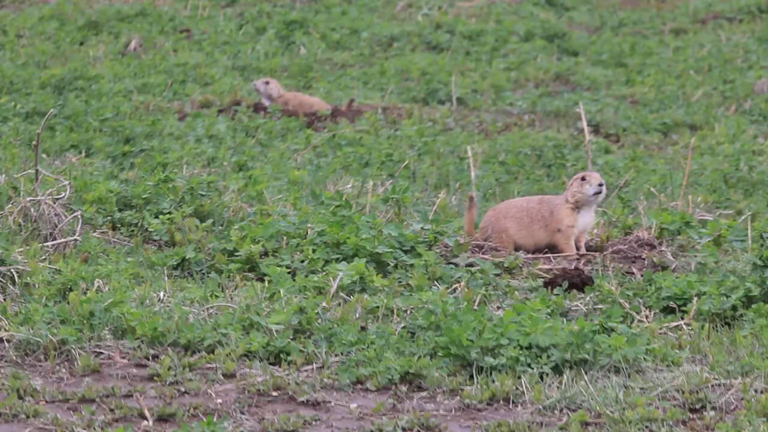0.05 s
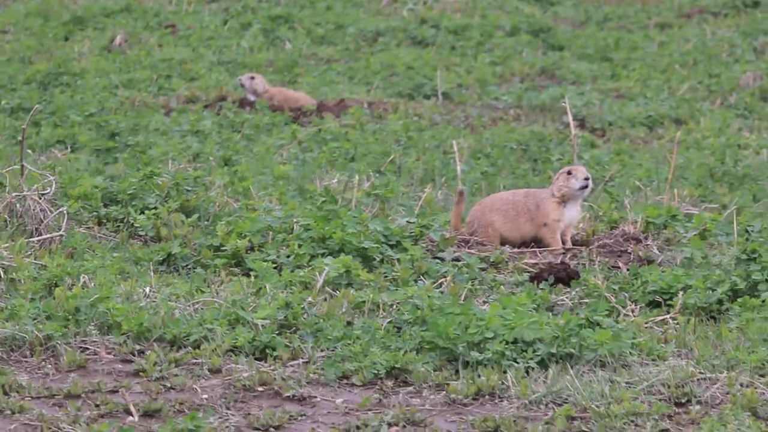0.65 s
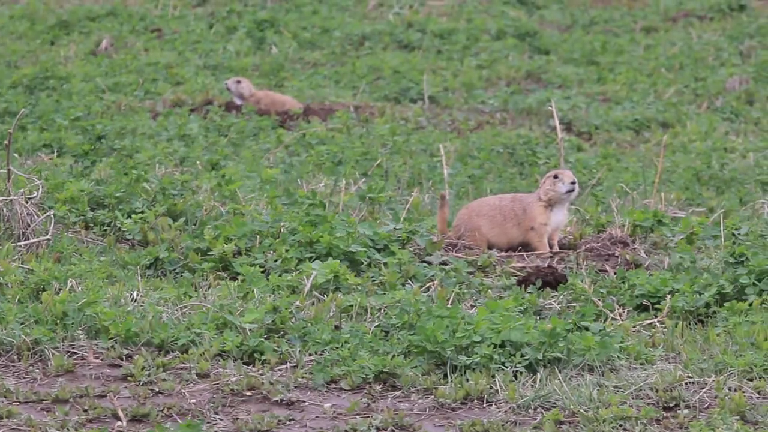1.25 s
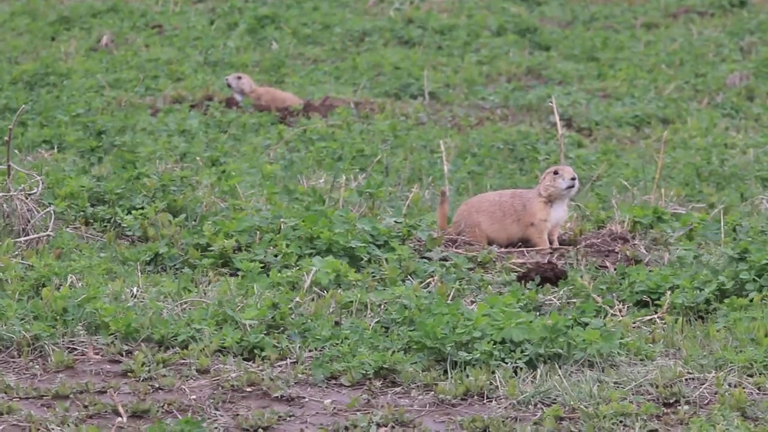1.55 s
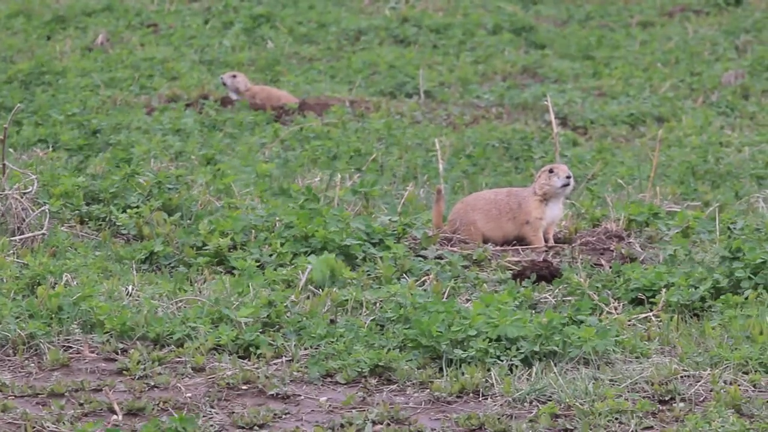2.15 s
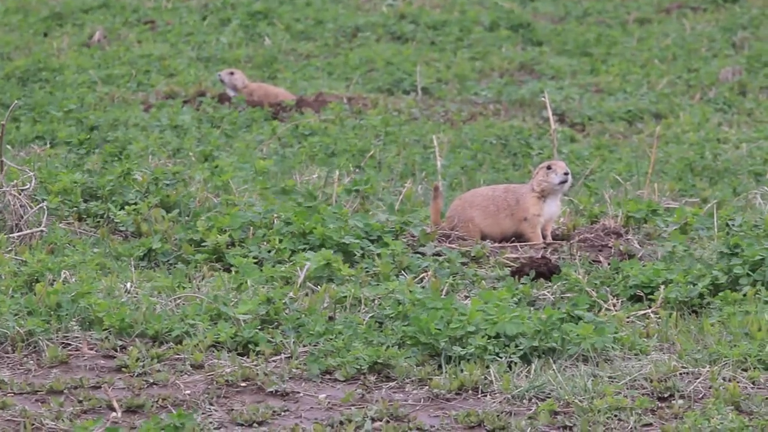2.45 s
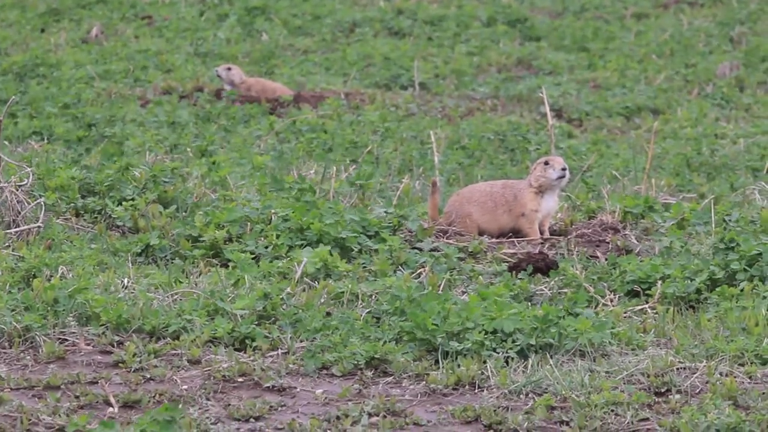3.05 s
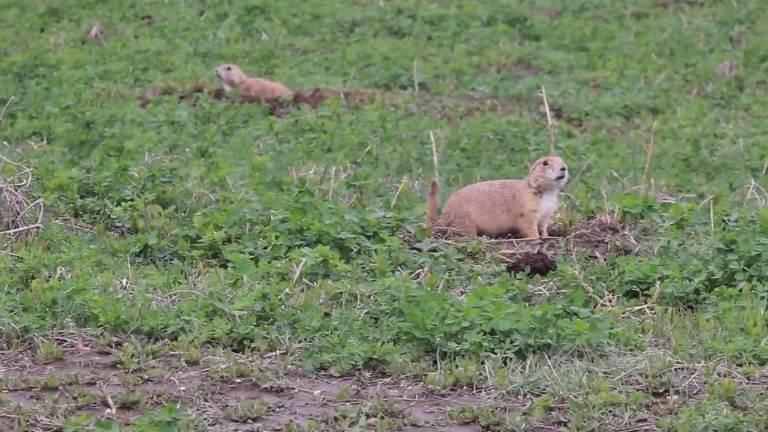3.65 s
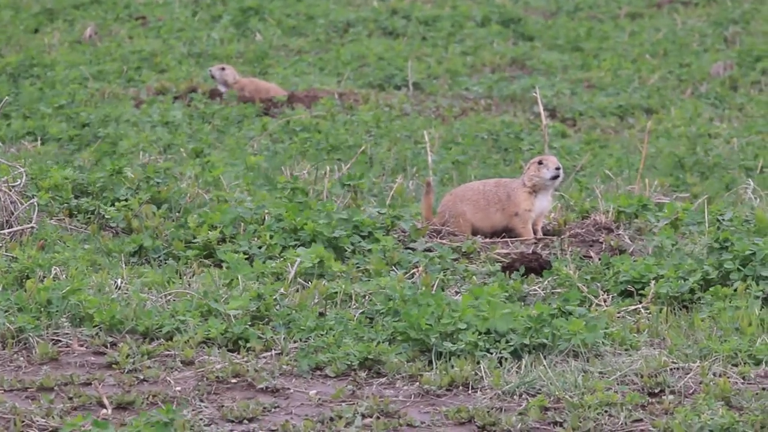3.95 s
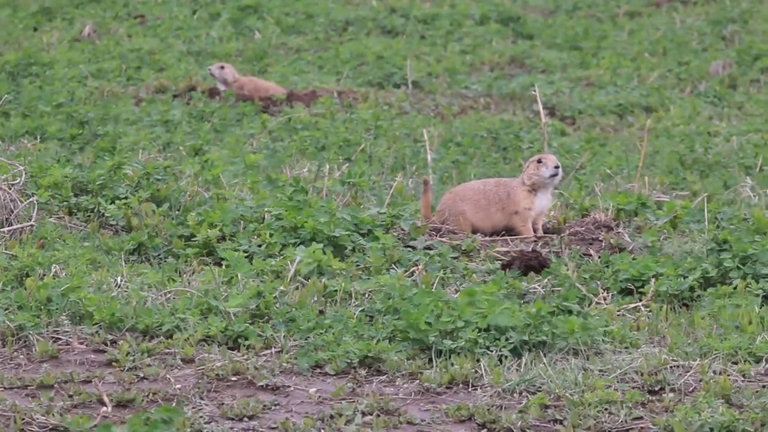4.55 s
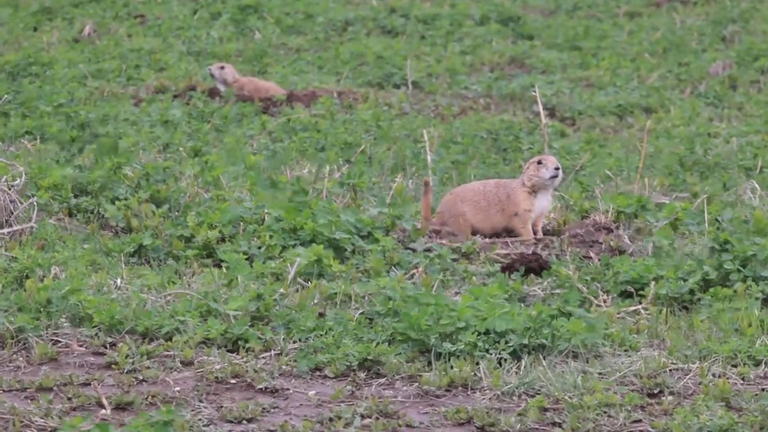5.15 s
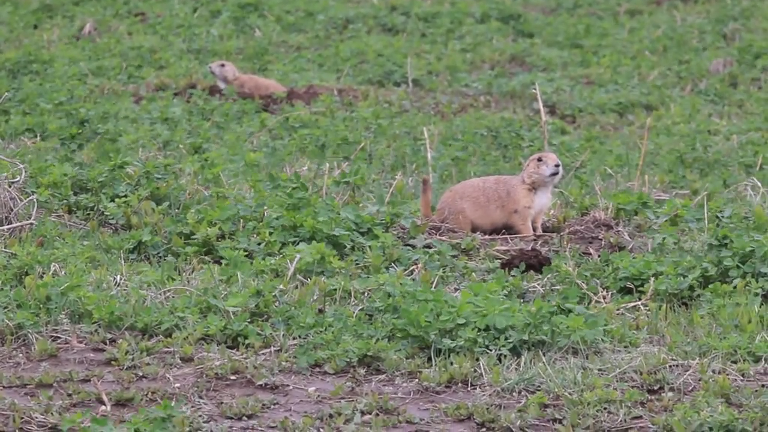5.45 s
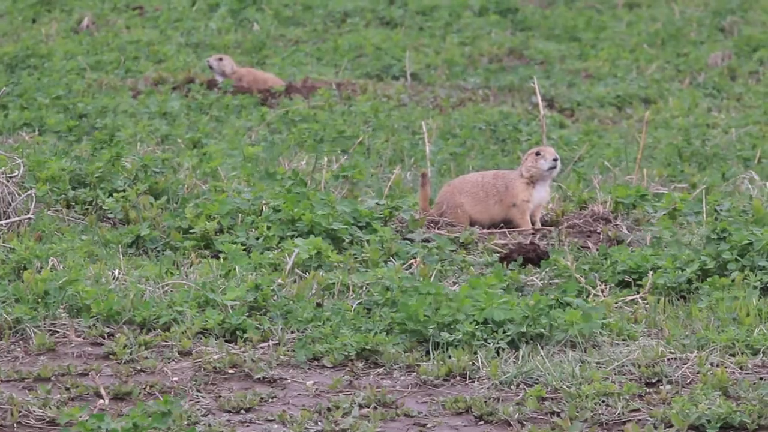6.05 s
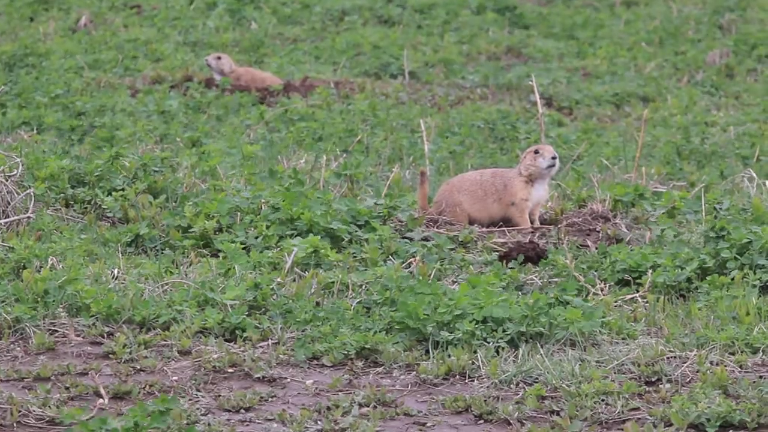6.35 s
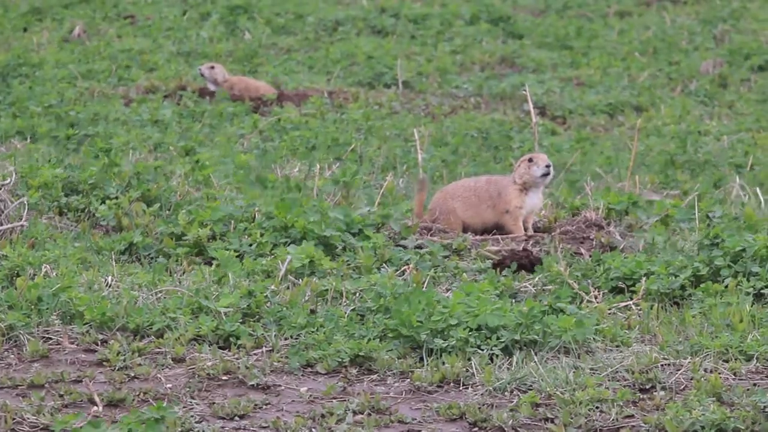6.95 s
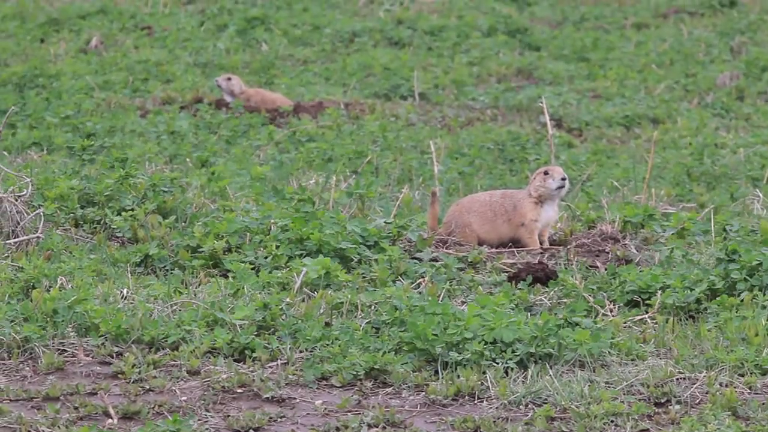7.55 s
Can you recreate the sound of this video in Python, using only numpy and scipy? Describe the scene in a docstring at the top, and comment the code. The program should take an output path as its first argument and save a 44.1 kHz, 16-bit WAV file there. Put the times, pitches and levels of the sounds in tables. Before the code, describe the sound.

A nearby prairie dog barks from about 0.3 seconds until the end, near 8 seconds, at a steady two or three barks a second. Each bark is a very short, bright chirp that rises and falls in pitch, some breaking into a hoarse rasp. A second prairie dog, farther off and much fainter, barks less regularly in the gaps. The open field gives almost no echo.

From about 0.2 seconds, strong gusts buffet the microphone with an uneven rumble, roar and crackle, often louder than the animals. Sharp wind snaps stand out around 1.3 to 1.5, 2.3, 4 and 6 seconds. The wind drops suddenly near 4.6 and 5.6 seconds, leaving a quiet rush of air, returns strongly from about 5.9 to 7, then weakens to brief puffs. A few very faint, short hisses fall between barks, around 3, 5.5 and 7.3 seconds.

```python
"""Prairie dogs in a gusty field

Two prairie dogs bark, one near and one farther off, each up to about 2.6 times a second. Every bark is
a short arch of pitch with many overtones, hoarser the higher it is, faintly scattered back by the grass.
Strong gusts buffet the microphone: eddies rumble, roar, crackle and snap. A few sudden lulls leave
the quiet rush of the field, and faint hisses come between the barks."""
import sys
import numpy as np
from scipy import signal
from scipy.fft import rfft, irfft, next_fast_len
from scipy.io import wavfile
from scipy.ndimage import uniform_filter1d, map_coordinates

SR = 44100
rng = np.random.default_rng(int(sys.argv[2]) if len(sys.argv) > 2 else 0)


def to_wav(s):
    """Save 16-bit WAV."""
    ch = np.atleast_2d(s).T  # columns
    pcm = np.round(np.clip(ch, -1, 1) * 32767)  # PCM
    wavfile.write(sys.argv[1], SR, pcm.astype(np.int16))


N = 344862

# The near animal's barks: start_s, length_s, top_pitch_hz, level_db (relative)
NEAR_BARKS = [(.261, .044, 1700, -36), (.594, .039, 1686, -32), (.958, .05, 1720, -33.5),
              (1.341, 0.063, 1670, -42), (1.932, 0.052, 1790, -34), (2.31, 0.033, 1745, -33),
              (2.721, .041, 1830, -32), (3.134, .04, 1790, -33), (3.519, .042, 1677, -32.5),
              (3.922, 0.05, 1735, -38.5), (4.286, .038, 1706, -33.5), (4.598, 0.043, 1640, -31),
              (4.986, 0.044, 1682, -31), (5.363, 0.046, 1720, -33), (5.76, .046, 1767, -31.5),
              (6.135, 0.045, 1860, -35), (6.514, .036, 1846, -36.5), (6.889, 0.049, 1867, -36),
              (7.251, .046, 1813, -34), (7.628, 0.044, 1750, -30)]
# Its throat and mouth resonances: frequency_hz, gain_db
NEAR_THROAT = [(1700, -29), (2600, -12), (3350, -1.5), (3800, 1.5), (4300, -17), (5150, -15.5),
               (5800, -22.5), (6700, -23), (7700, -47.5), (8500, -42), (9700, -33), (11000, -50.5),
               (14100, -46.5), (15500, -66)]
# The colour of its hoarse breath: frequency_hz, gain_db
BREATH_COLOUR = [(1500, -20), (3000, 2.5), (5500, 4), (7700, -18.5), (9500, -10), (12000, -20.5),
                 (14200, -22), (15800, -27.5)]


def near_dog():
    """The lead voice: bright barks, with throat turbulence that grows toward the end of hoarse ones."""
    voice = barking(NEAR_BARKS, NEAR_THROAT, droop=0.44, sag=1.15, rasp_rad=.15, doubling_db=-19)
    swell = np.zeros(N + SR)
    for start, length, top_hz, db in NEAR_BARKS:
        u = np.linspace(0, 1, int(length * SR))
        fades = np.clip(np.minimum(u, 1 - u) / .1, 0, 1)
        swell[round(start * SR):][:len(u)] += amp(db) * hoarseness(top_hz) * voice_break(u) * fades
    breath = swell[:N] * coloured_noise(BREATH_COLOUR)
    return amp(-1) * voice + amp(-24) * breath


# The far animal's barks: start_s, top_pitch_hz, level_db (relative)
FAR_BARKS = [(.355, 1860, -55.5), (0.717, 1830, -61), (1.11, 1840, -72), (1.84, 1850, -61),
             (2.188, 1840, -56), (2.935, 1830, -64.5), (3.323, 1800, -61), (3.711, 1840, -63.5),
             (4.067, 1810, -70), (4.523, 1710, -74.5), (4.786, 1765, -60), (5.244, 1656, -76),
             (5.546, 1740, -67.5), (6.261, 1750, -61), (7, 1700, -68.5), (7.349, 1700, -70.5),
             (7.725, 1710, -66.5)]
# Its throat and mouth resonances: frequency_hz, gain_db
FAR_THROAT = [(1700, 4.5), (3400, 8), (5300, 4.5), (6900, 0), (8300, -24.5), (10500, -26), (12000, -18.5),
              (14500, -48)]


def far_dog(length_s):
    """The second voice: faint barks of one length, with stronger tones between the overtones."""
    barks = [(start, length_s, top_hz, db) for start, top_hz, db in FAR_BARKS]
    return amp(-.5) * barking(barks, FAR_THROAT, droop=.33, sag=1.0, rasp_rad=0.13, doubling_db=-2.5)


def barking(barks, throat, droop, sag, rasp_rad, doubling_db):
    """In each bark the pitch rises and falls, sliding the overtones through the throat's resonances."""
    out = np.zeros(N + SR)
    for start, length, top_hz, db in barks:
        size = int(length * SR)
        u = np.linspace(0, 1, size)
        hoarse = hoarseness(top_hz)
        apex = .475 - .06 * hoarse  # a hoarse bark peaks earlier
        arch = 1 - droop * (u - apex) ** 2 - sag * (u - apex) ** 4  # slack folds steepen both ends
        pitch = top_hz * arch * (1 + 0.0024 * wobble(500, size))
        rough = hoarse * voice_break(u)
        phase = 2 * np.pi * np.cumsum(pitch) / SR + rasp_rad * rough * wobble(2200, size)
        voice = np.zeros(size)
        for k in range(1, 10):
            flicker_db = 0.37 * k * wobble(98, size)
            overtone = amp(curve_at(throat, k * pitch) + flicker_db) * np.sin(k * phase)
            # alternate cycles differ, which adds tones halfway between the overtones
            between = amp(curve_at(throat, (k + .5) * pitch) + doubling_db) * np.sin((k + .5) * phase)
            voice += overtone + rough * between * wobble(300, size)
        fades = np.clip(u / 0.093, 0, 1) * np.clip((1 - u) / 0.083, 0, 1)
        out[round(start * SR):][:size] += voice * fades * amp(db + 0.49 * wobble(220, size))
    return out[:N]


def hoarseness(top_hz, clear_hz=1617, strain_span_hz=280):
    """The voice strains as it climbs: 0 is clear, 1 fully hoarse."""
    return np.clip((top_hz - clear_hz) / strain_span_hz, 0, 1)


def voice_break(u, early_rasp=0.2, break_at=0.52, width=0.11):
    """A hoarse bark starts almost clean and breaks into a rasp as u runs from 0 to 1."""
    return early_rasp + .5 * (1 + np.tanh((u - break_at) / width))


# Gusts on the microphone: start_s, length_s, opening_level_db (relative), drop_db, extra_fizz_db
GUSTS = [(.193, 0.065, -31, 0, 3.5), (0.278, 0.34, -24.5, -3, -3.5), (0.661, 0.038, -20.5, 3.5, -3.5),
         (0.817, .055, -27, 0.5, -8), (.922, 0.022, -24.5, 4, -9), (0.996, 0.025, -26.5, -6, -4.5),
         (1.024, 0.26, -21.5, -1.5, -4.5), (1.278, .15, -22, 1.5, 7), (1.494, 0.23, -20, 5.5, 6),
         (1.699, .1, -27.5, -0.5, 3.5), (1.809, 0.12, -22, 5, 3.5), (1.943, .49, -24, 0, 4.5),
         (2.514, 0.34, -21, 5.5, 2.5), (2.848, 0.13, -26.5, 3, -6), (3.063, 0.2, -22.5, -1.5, -2.5),
         (3.279, 0.22, -22.5, 4, 0), (3.574, 0.3, -24, -5.5, -2), (3.882, .24, -26.5, 0.5, 3),
         (3.982, .014, -20, -1, 7.5), (4.144, .33, -24, 2, 0), (4.683, .26, -24.5, -4, -5),
         (4.959, .14, -30.5, 3.5, -3), (5.105, 0.11, -19, 1.5, 1), (5.373, .12, -31.5, 4.5, 4.5),
         (5.557, 0.0075, -41, -2.5, -1), (5.785, 0.094, -37, -10, -10), (5.874, 0.095, -19.5, 3, 4),
         (5.988, 0.19, -22, -1.5, 4), (6.3, 0.27, -22.5, 0.5, 3), (6.541, 0.46, -21.5, 7, -1.5),
         (7.105, .125, -27, -5, -6), (7.246, 0.071, -28, 11, 3.5), (7.429, .1, -35, -1, -16),
         (7.571, 0.029, -42, -3.5, -3)]
# The light breeze between them: time_s, level_db (relative)
BREEZE = [(.1, -66), (.95, -41), (1.45, -25.5), (2.47, -35.5), (3.5, -30.5), (4.45, -46), (4.55, -64),
          (5.3, -51.5), (5.64, -69), (6.0, -27), (6.25, -29.5), (7.05, -45), (7.38, -49), (7.7, -63),
          (7.8, -57)]


def gusts(surge_db, surge_hz, rise_db_per_s=649, fall_db_per_s=697):
    """Gusts rise, hold and fall, driving rumble, roar and fizz levels (dB about each one's mean power)."""
    t = np.arange(0, N / SR, .002)
    strength = np.interp(t, *np.transpose(BREEZE))
    extra_fizz = np.zeros(len(t))
    for start, length, db, drop_db, fizz_db in GUSTS:
        edges = rise_db_per_s * np.maximum(start - t, 0) + fall_db_per_s * np.maximum(t - start - length, 0)
        gust = db - drop_db * np.clip((t - start) / length, 0, 1) - edges
        extra_fizz = np.where(gust > strength, fizz_db, extra_fizz)
        strength = np.maximum(strength, gust)
    sample_times = np.arange(N) / SR
    roar = np.interp(sample_times, t, strength) + surge_db * wobble(surge_hz, N)
    rumble = 0.59 * roar
    fizz = 1.54 * roar + np.interp(sample_times, t, uniform_filter1d(extra_fizz, size=6))
    return [db - 10 * np.log10(np.mean(amp(db) ** 2)) for db in (rumble, roar, fizz)]


# The strongest single eddies: time_s, strength (relative)
EDDIES = [(0.189, 12.5), (0.27, 3), (.44, 9.5), (0.479, 8), (0.676, 3), (.821, 13), (1.045, 10),
          (1.294, 12), (1.659, 3), (1.955, 12), (2.396, 6), (2.693, 12), (2.826, 5.5), (3.003, 9),
          (3.068, 2), (3.624, 6), (3.655, 5), (4.308, 10.5), (4.426, 10.5), (4.867, 6), (4.922, 4.5),
          (4.966, 14), (5.171, 4.5), (5.424, 15.5), (7.151, 13), (7.226, 8.5), (7.5, 11.5), (7.523, 10.5)]


def turbulence(eddy_hz, swirl_hz, life_s):
    """Strength of the eddies passing the microphone port: a random swirl, with strong ones on cue."""
    swirl = unit_rms(wobble(eddy_hz, N) + 0.84 * wobble(swirl_hz, N))
    half = SR // 20
    u = np.arange(-half, half) / SR / life_s
    reach = 2.5  # in eddy lives
    calm = 1 - np.exp(-(u / reach) ** 2)  # a strong eddy pushes the small ones aside
    slack = 4 * np.exp(-(u + reach) ** 2)  # the air slackens just ahead of it
    for time, strength in EDDIES:
        span = slice(round(time * SR) - half, round(time * SR) + half)
        swirl[span] = swirl[span] * calm + 0.32 * (strength * np.exp(-u ** 2) - slack)
    return 3 * np.tanh(swirl / 3)


# The colour of the buffeting: frequency_hz, gain_db
BUFFET_COLOUR = [(13, -37), (22, -23.5), (66, -4.5), (108, -1), (299, 0.5), (645, -4.5), (3540, -27),
                 (3950, -32.5), (15600, -81)]
# How hard an eddy of unit strength shakes each band: frequency_hz, depth_db
FLUTTER_DEPTH = [(100, 1.1), (500, 3), (2000, 2.5), (5000, 2.5), (11000, 3.5)]


def wind_buffet(rumble, roar, fizz, crackle_db, crackle_hz, knee_hz, floor_db):
    """Wind on the microphone in half-octave bands: each eddy lifts them all, the high ones most."""
    eddies = turbulence(eddy_hz=650, swirl_hz=140, life_s=0.0034)
    crackle = crackle_db * np.clip(wobble(crackle_hz, N), -2.8, 2.8)  # the finest eddies tear in ticks
    tearing = 2.5 * np.tanh(fizz / 6) + crackle  # fierce gusts open the top octaves
    # slow air carries no small eddies: the roar rolls off at a knee that rises with the flow
    knee = knee_hz * amp(0.66 * (roar + 8.2 * eddies))
    white, out = rng.standard_normal(N), np.zeros(N)
    for centre in 31.25 * 2 ** np.arange(0, 9.5, .5):
        band = filtered(white, lambda hz: np.clip(1 - 2 * abs(np.log2((hz + 1) / centre)), 0, 1))
        low = curve_at([(220, 1), (800, 0.14)], centre)
        high = curve_at([(2000, 0.0089), (4800, 0.92)], centre)
        top = curve_at([(2200, 0), (10000, 0.92)], centre)
        gust_db = low * rumble + (1 - low - high) * roar + high * fizz + top * tearing
        flutter_db = curve_at(FLUTTER_DEPTH, centre) * eddies
        rolloff = amp(floor_db) + 1 / (1 + (centre / knee) ** 4)
        out += band * unit_rms(rolloff * amp(gust_db + flutter_db))
    return unit_rms(filtered(out, lambda hz: amp(curve_at(BUFFET_COLOUR, hz))))


# The hardest eddies snapping on the port: time_s, level_db (relative)
SNAPS = [(.677, -32.5), (1.292, -26), (1.528, -24.5), (1.656, -32.5), (2.186, -30.5), (2.336, -24),
         (2.394, -33), (3.654, -32), (3.983, -25), (4.424, -33), (5.127, -34), (5.168, -29.5),
         (5.937, -24.5), (6.073, -21.5), (6.445, -29), (7.22, -42)]


def wind_snaps(fizz, hard_db, small_db, base_rate_hz, life_s, port_hz):
    """Steep pressure fronts that relax at once: a few hard ones, and many small ones in fierce gusts."""
    hits = rng.random(N) < base_rate_hz / SR * amp(1.7 * fizz)
    fronts = hits * amp(small_db + 0.35 * fizz) * rng.standard_normal(N)
    for time, db in SNAPS:
        fronts[round(time * SR)] += amp(db + hard_db)
    u = np.arange(SR // 50) / SR / life_s
    cracks = signal.fftconvolve(fronts, (1 - u) * np.exp(-u))[:N]
    return filtered(cracks, lambda hz: 1 / (1 + (hz / port_hz) ** 2))  # the port rounds off each front


def field_scatter(voice, t60_s):
    """Grass and mounds scatter back a short diffuse tail."""
    t = np.arange(SR // 2) / SR
    tail = rng.standard_normal(len(t)) * amp(-60 * t / t60_s)
    return signal.fftconvolve(voice, tail / np.linalg.norm(tail))[:N]


# Faint hisses between the barks: start_s, length_s, level_db
HISSES = [(2.984, 0.014, -55), (5.327, 0.022, -64), (5.587, 0.05, -59), (5.709, 0.022, -64),
          (7.296, 0.048, -61), (7.58, .025, -71), (7.71, 0.028, -64)]
# Their colour: frequency_hz, gain_db
HISS_COLOUR = [(1500, -23), (3000, 3), (4500, -1), (6500, -18), (8500, -34), (15000, -37)]


def hisses():
    """Short soft patches of high noise, each with a rounded swell."""
    t, swell = np.arange(N) / SR, np.zeros(N)
    for start, length, db in HISSES:
        from_middle = 2 * (t - start) / length - 1
        swell += amp(db) * np.sqrt(np.clip(1 - from_middle ** 2, 0, 1))
    return swell * coloured_noise(HISS_COLOUR)


# The colour of the open air: frequency_hz, gain_db
AIR_COLOUR = [(30, -8.5), (150, 6.5), (400, -9), (1000, -11.5), (1700, -18), (3000, -26), (5500, -33),
              (8000, -43.5), (15000, -46.5)]


def open_air(level_db):
    """The quiet, wavering rush of the field, heard in the lulls."""
    return coloured_noise(AIR_COLOUR) * amp(level_db + 1.5 * wobble(5.4, N))


def amp(db):
    """Decibels to gain."""
    return 10 ** (np.asarray(db) / 20)


def unit_rms(x):
    """x scaled to rms 1."""
    return x / np.sqrt(np.mean(x ** 2) + 1e-20)


def curve_at(points, hz):
    """A curve of (frequency, value) points, read on a log frequency axis."""
    frequencies, values = np.transpose(points)
    return np.interp(np.log(hz + 1), np.log(frequencies + 1), values)


def wobble(rate_hz, size):
    """A smooth random curve with rate_hz knots a second."""
    knots = rng.standard_normal(int(size * rate_hz / SR) + 4)
    return map_coordinates(knots, [np.arange(size) * rate_hz / SR])


def filtered(x, response):
    """x equalised by response, a gain for each frequency."""
    size = next_fast_len(N + 8192)
    return irfft(rfft(x, size) * response(np.fft.rfftfreq(size, 1 / SR)), size)[:N]


def coloured_noise(colour):
    """Noise at rms 1, shaped by (frequency_hz, gain_db) points."""
    return unit_rms(filtered(rng.standard_normal(N), lambda hz: amp(curve_at(colour, hz))))


def scene():
    """The mono mix: both animals and their echoes, the wind, and a bed of quiet air."""
    near, far = near_dog(), far_dog(length_s=.049)
    echoes = amp(-22) * field_scatter(near, t60_s=0.12) + amp(-17.5) * field_scatter(far, t60_s=.3)
    rumble, roar, fizz = gusts(surge_db=1.5, surge_hz=46)
    buffet = wind_buffet(rumble, roar, fizz, crackle_db=5.5, crackle_hz=1500, knee_hz=3200, floor_db=-14)
    snaps = wind_snaps(fizz, hard_db=10.5, small_db=-32, base_rate_hz=45, life_s=0.00049, port_hz=7960)
    return (near + far + echoes + amp(-21.5) * buffet + snaps + hisses() + open_air(level_db=-57.5))[None]


def record(dry, ceiling=.66, top_hz=15800):
    """A quick fade-in; the microphone squashes the tallest gusts and passes nothing above top_hz."""
    fade_in = np.clip((np.arange(N) / SR - .06) / .015, 0, 1)
    pressure = dry[0] * fade_in
    squashed = pressure / (1 + (pressure / ceiling) ** 4) ** .25
    return filtered(squashed, lambda hz: hz < top_hz)[None]


dry = scene()
out = record(dry)
to_wav(out)
```